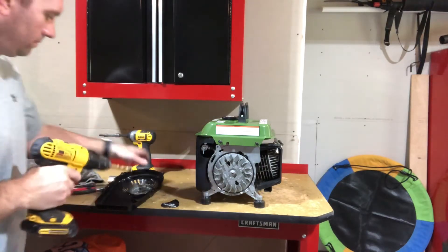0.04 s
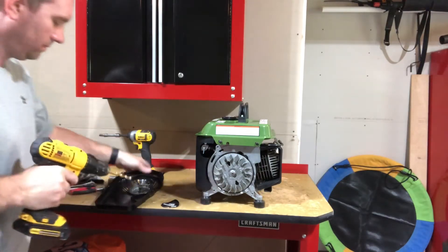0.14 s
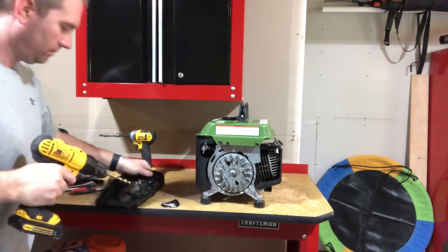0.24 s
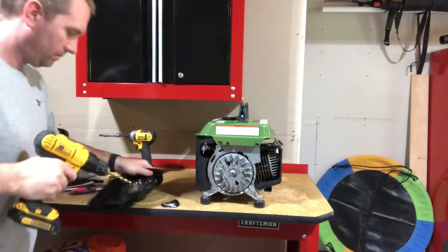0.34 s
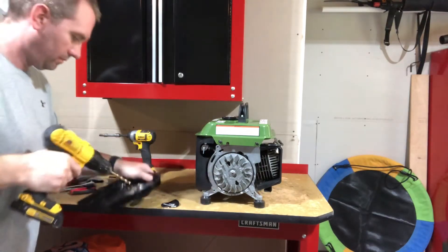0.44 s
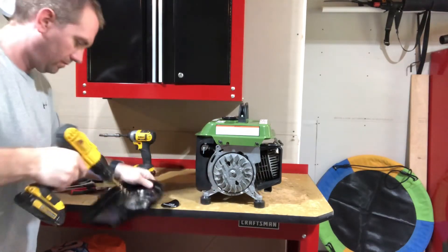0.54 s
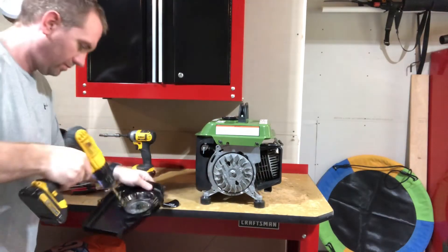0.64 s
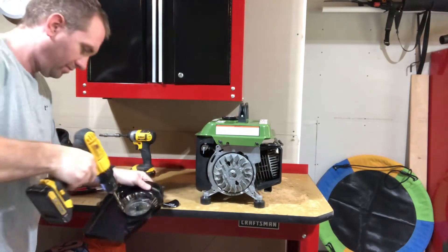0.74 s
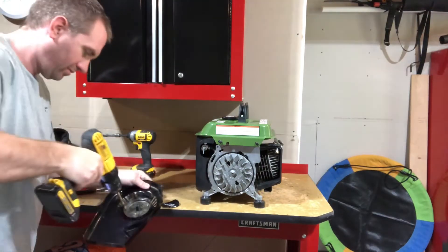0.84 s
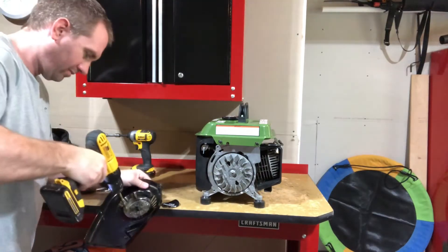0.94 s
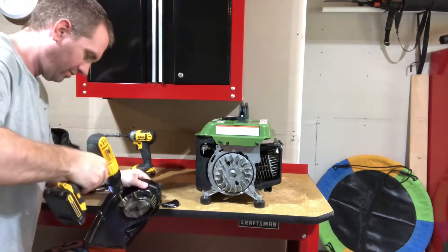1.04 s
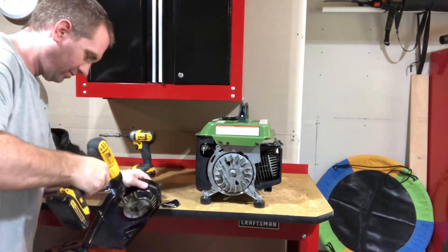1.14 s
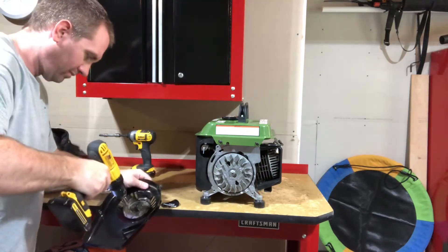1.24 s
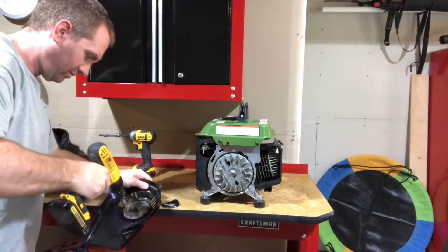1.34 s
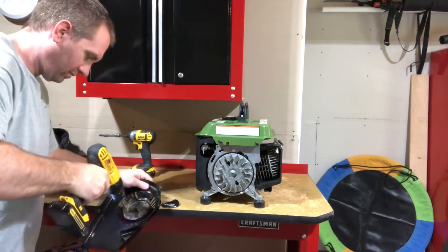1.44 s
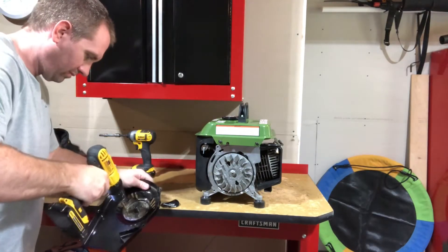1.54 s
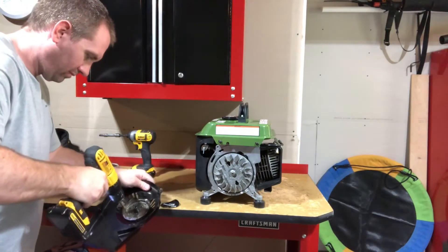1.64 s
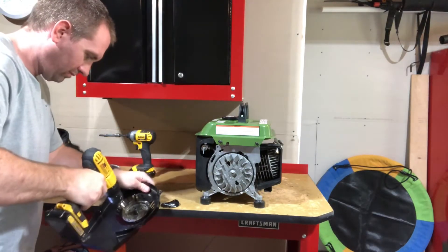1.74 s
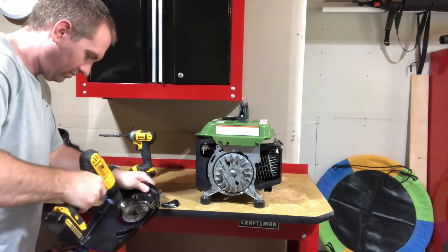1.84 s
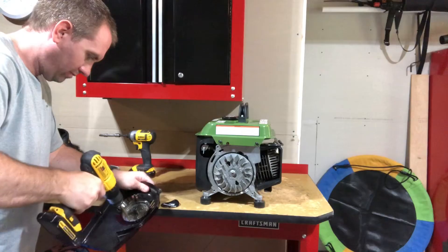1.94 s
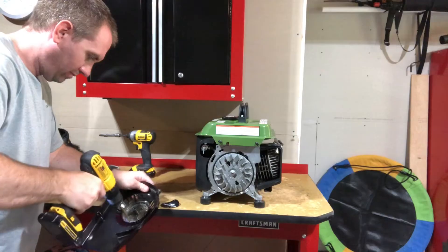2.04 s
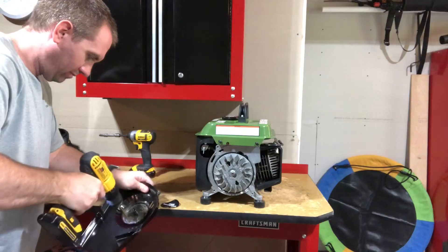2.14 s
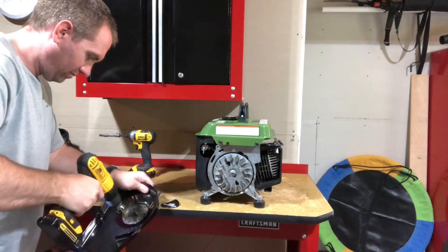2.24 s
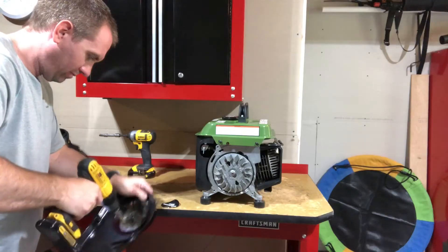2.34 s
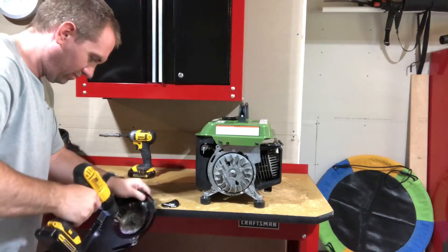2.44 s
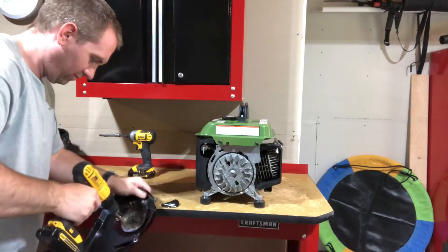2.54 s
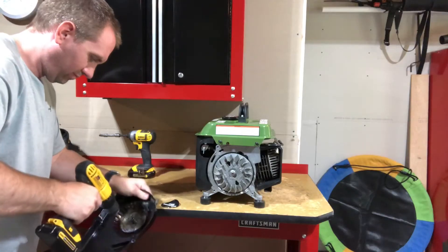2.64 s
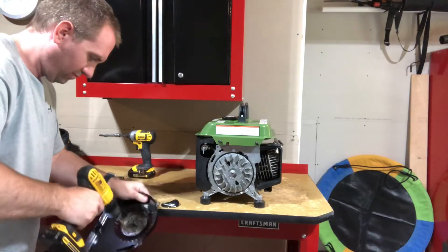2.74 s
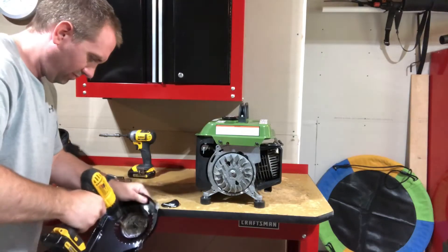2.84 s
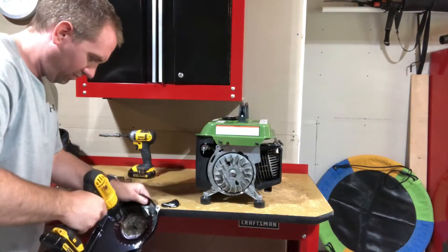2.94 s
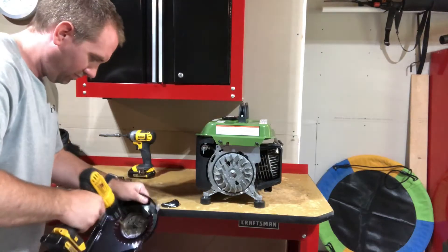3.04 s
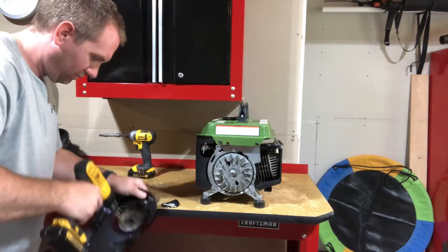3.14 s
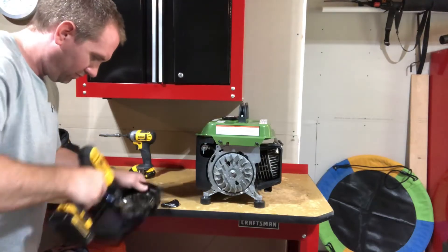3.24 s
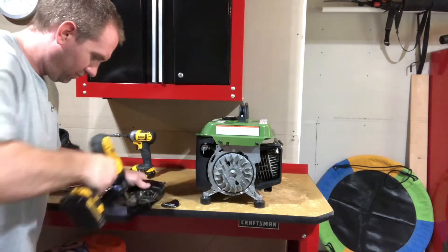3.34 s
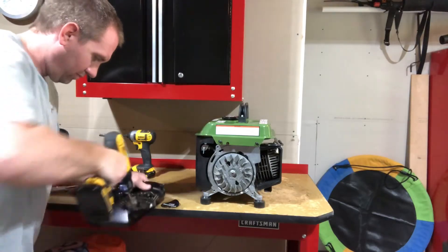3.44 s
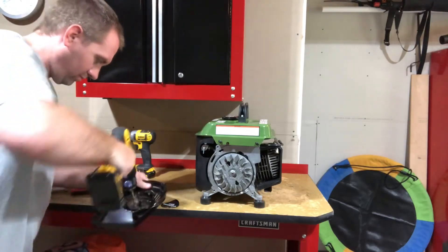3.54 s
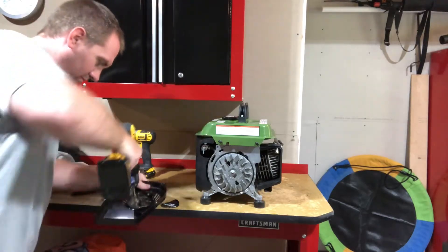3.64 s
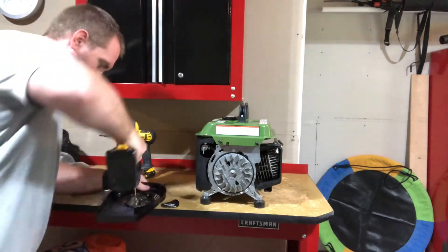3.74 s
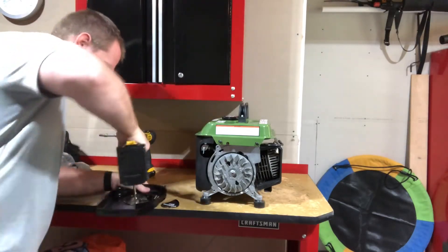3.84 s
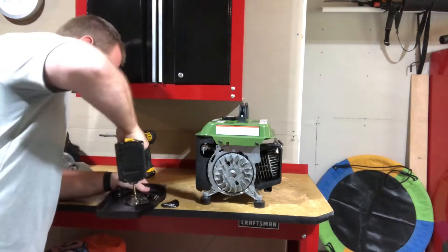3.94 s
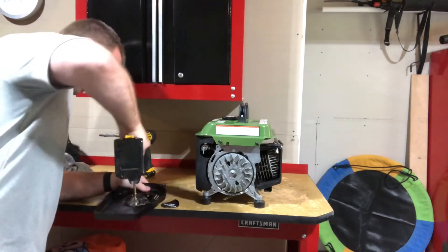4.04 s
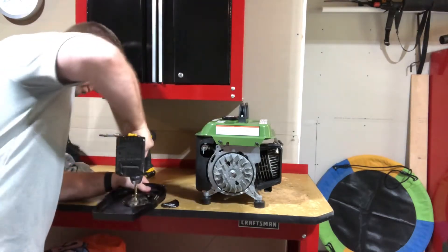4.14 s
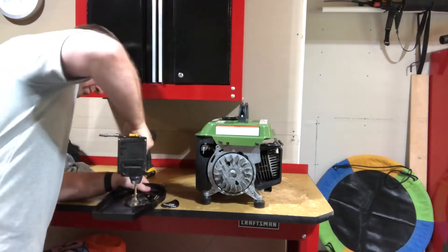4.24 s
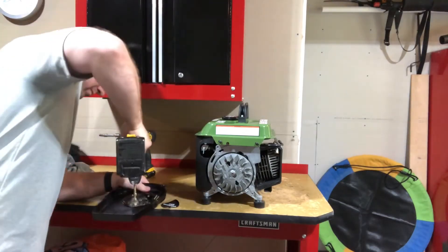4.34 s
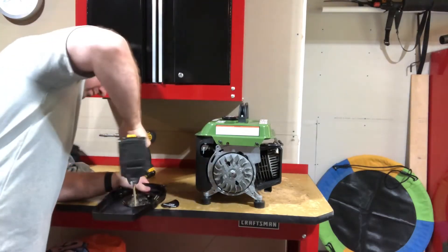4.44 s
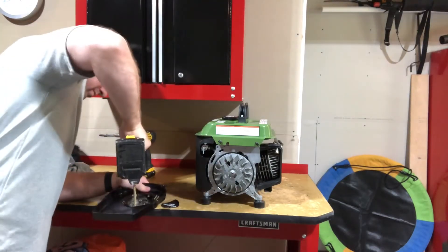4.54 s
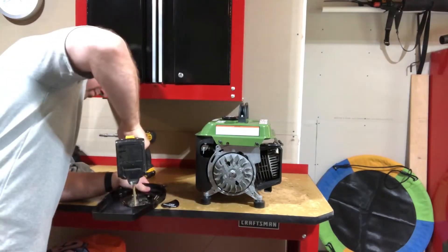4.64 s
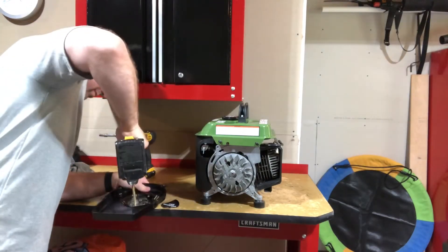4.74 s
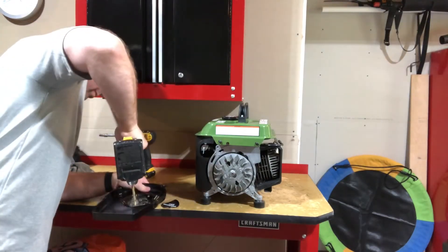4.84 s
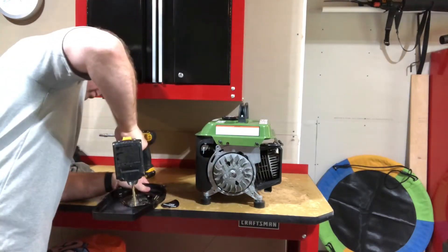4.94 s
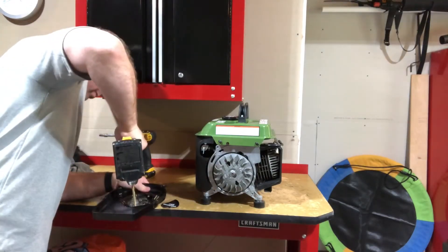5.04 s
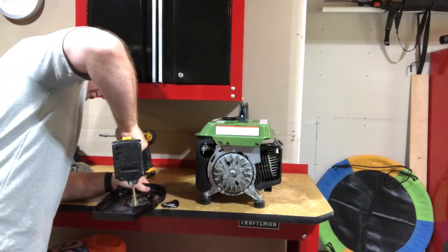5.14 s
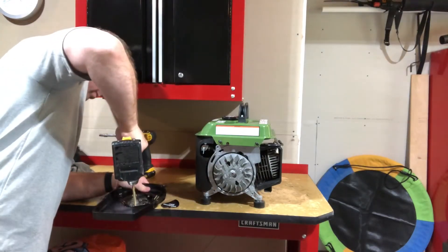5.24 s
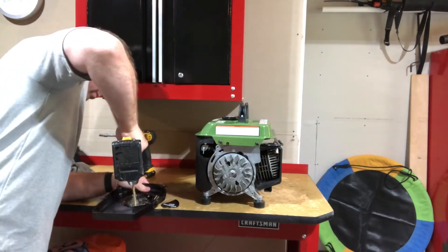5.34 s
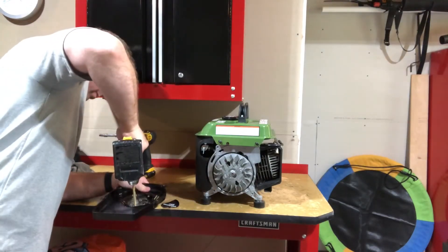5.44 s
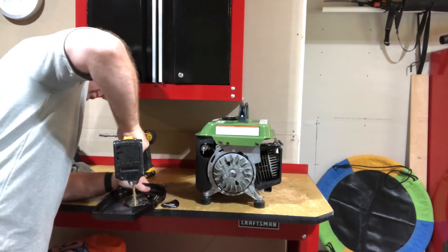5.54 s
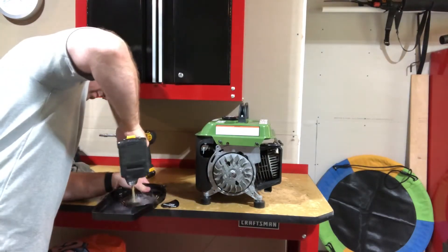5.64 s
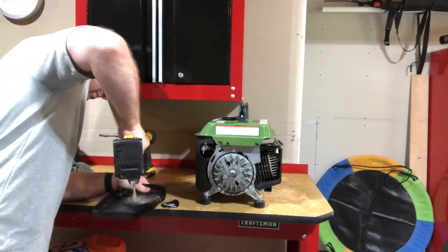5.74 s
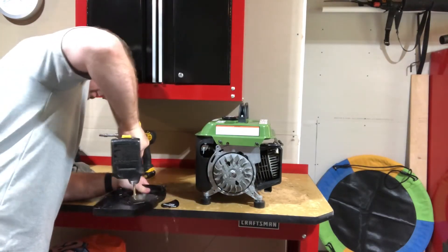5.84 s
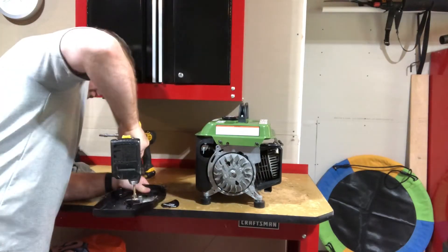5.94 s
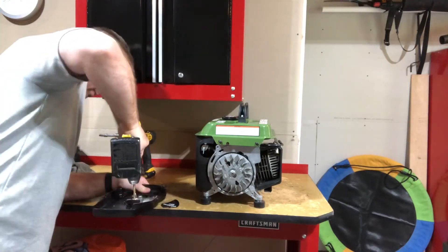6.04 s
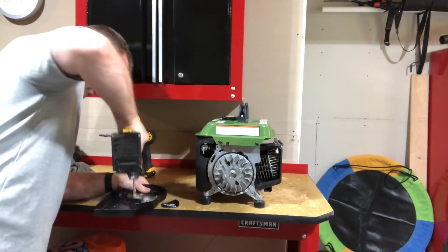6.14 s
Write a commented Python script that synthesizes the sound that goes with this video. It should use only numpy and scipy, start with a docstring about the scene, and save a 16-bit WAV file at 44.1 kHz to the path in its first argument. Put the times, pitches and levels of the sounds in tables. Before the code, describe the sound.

Sheet-metal cover knocks on a workbench, then a whining cordless drill bores twice with gritty rasp, ending in a loud clanging break-through.

```python
"""Over quiet room air, a sheet-metal cover is knocked about on a workbench in a bare garage: rattling bursts,
booms and clicks. Then a cordless drill bores into it twice. The speed control whistles at one pitch, the gears
whine along a speed curve that sinks as the bit is loaded, and chips make dense clicks shaped by the sheet.
At the end the bit breaks through and its lips snag the cover, in ringing bursts loud enough to overload
the mono microphone."""
import sys
import numpy as np
from scipy import signal
from scipy.fft import rfft, irfft
from scipy.io import wavfile

SR = 44100
rng = np.random.default_rng(int(sys.argv[2]) if len(sys.argv) > 2 else 0)


def persist_wave(psi):
    """Save psi, clipped to +-1, as 16-bit WAV."""
    counts = np.round(np.clip(psi, -1, 1) * 32767).astype(np.int16)
    wavfile.write(sys.argv[1], SR, np.atleast_2d(counts).T)


N = 272537
TIME = np.arange(N) / SR


def from_db(db):
    """Turn decibels into a gain."""
    return 10 ** (np.asarray(db) / 20)


def rms_one(x):
    """Scale a sound to unit power."""
    return x / np.sqrt(np.mean(x ** 2) + 1e-20)


def in_time(rows):
    """Read the columns of a curve at every sample."""
    s, *columns = np.transpose(rows)
    return [np.interp(TIME, s, c) for c in columns]


def running(start_s, end_s, edge_s=0.012):
    """One between two moments, with short ramps."""
    return np.clip(np.minimum(TIME - start_s, end_s - TIME) / edge_s + .5, 0, 1)


def at_hz(points, hz):
    """Read a table of values against pitch, on a logarithmic pitch axis."""
    f, value = np.transpose(points)
    return np.interp(np.log(np.maximum(hz, 1)), np.log(f), value)


def drift(rate_hz):
    """Random wandering of unit power, with this many new values a second."""
    knots = rng.standard_normal(4096)
    return rms_one(np.interp(TIME * rate_hz, np.arange(len(knots)), knots))


def convolve(x, response):
    """Pass a sound through an impulse response."""
    return signal.fftconvolve(x, response)[:N]


def colour(x, points, size=4096):
    """Filter with the given gains, without any sound ahead of the input (minimum phase)."""
    hz = np.arange(size // 2 + 1) * SR / size
    cepstrum = irfft(np.log(from_db(at_hz(points, hz))))
    # folding the cepstrum forward in time makes the filter minimum phase
    cepstrum[1:size // 2] *= 2
    cepstrum[size // 2 + 1:] = 0
    return convolve(x, irfft(np.exp(rfft(cepstrum))))


def three_bands(x, low_hz, high_hz):
    """Split a sound into bass, middle and treble."""
    cuts = [(low_hz, "low"), ([low_hz, high_hz], "band"), (high_hz, "high")]
    return [signal.sosfilt(signal.butter(3, hz, kind, fs=SR, output="sos"), x) for hz, kind in cuts]


def resonate(x, modes):
    """Each resonance of the sheet adds a narrow band of the sound to itself."""
    out = x.copy()
    for hz, width_hz, db in modes:
        r = np.exp(-np.pi * width_hz / SR)
        feed = np.array([1, 0, -1]) * (1 - r * r) / 2
        feedback = [1, -2 * r * np.cos(2 * np.pi * hz / SR), r * r]
        out += from_db(db) * signal.lfilter(feed, feedback, x + 1e-18)
    return out


def free_ring(x, modes):
    """The sheet sings on after a blow: each mode is a sine that dies away."""
    t = TIME[:SR]
    response = 0
    for hz, db, t60 in modes:
        sine = np.sin(2 * np.pi * hz * t)
        response = response + from_db(db - 60 * t / t60) * sine / np.sqrt(t60 * SR)
    return convolve(x, response)


# how long the echo of the garage takes to fall by 60 dB: pitch_hz [Hz], t60_s [s]
GARAGE_DECAY = [(60, 0.99), (250, 1.44), (1000, 0.7), (4000, 0.98), (8000, 0.74), (15000, 0.45)]


def garage(x, wet_db, treble_db, gap_s=0.0038):
    """Direct sound plus an echo tail of noise bands with their own decays; the power stays about the same."""
    t = TIME[:int(SR * np.sqrt(2))]
    edges = np.geomspace(30, 17000, 13)
    tail = 0
    for low, high in zip(edges, edges[1:]):
        hz = np.sqrt(low * high)
        t60 = at_hz(GARAGE_DECAY, hz)
        band_filter = signal.butter(2, [low, high], "band", fs=SR, output="sos")
        band = signal.sosfilt(band_filter, rng.standard_normal(len(t)))
        tilt = from_db(at_hz([(1000, 0.0044), (10000, treble_db)], hz))
        gain = tilt * np.sqrt(2 * np.log(1000) / (t60 * SR))
        tail = tail + gain * band * from_db(-60 * t / t60)
    onset = np.clip(t / gap_s - 1, 0, 1)   # silent for one gap, then fades in over another
    wet = from_db(wet_db)
    return (x + wet * convolve(x, tail * onset)) / np.sqrt(1 + wet ** 2)


# colour of the room air: pitch_hz [Hz], relative level_db [dB per Hz]
AIR_COLOUR = [(15, -74), (25, -9), (96, 6), (614, -11.5), (722, -9), (782, -7.5), (895, -7), (1110, -9.5),
              (1340, -11), (1450, -8), (1570, -15), (1800, -18), (3530, -21.5), (15500, -33)]
AIR_DB = -55.76


def room_air():
    """Steady coloured noise under everything."""
    return from_db(AIR_DB) * rms_one(colour(rng.standard_normal(N), AIR_COLOUR))


TILT_LOW_HZ, TILT_PIVOT_HZ, TILT_HIGH_HZ = 200, 1030, 6050   # a harder contact tilts the colour over this range


def blows(table, spectrum, modes, rise_share, ring_db):
    """Each blow is a dying burst of rattling contact, brighter if harder; long ones start more softly."""
    age = TIME[:SR // 5]
    hz, colour_db = np.transpose(spectrum)
    octaves = np.log2(np.clip(hz, TILT_LOW_HZ, TILT_HIGH_HZ) / TILT_PIVOT_HZ)
    out = np.zeros(N)
    for s, db, hardness, length_s, *_ in table:
        rise = 1 - np.exp(-age / (rise_share * length_s))
        rattle = rng.choice([-1., 1.], len(age)) * from_db(-60 * age / length_s) * rise
        shape = np.transpose([hz, db + colour_db + hardness * octaves])
        start = int(s * SR)
        out[start:start + len(age)] += colour(rattle, shape)[:len(age)]
    return out + from_db(ring_db) * free_ring(out, modes)


def boom(s, db, centre_hz, octaves, t60, rise_s=0.0044, count=40):
    """A knock sets many close panel modes swinging, strongest around a centre pitch."""
    out, age = np.zeros(N), TIME[:SR // 3]
    offset = np.linspace(-2, 2, count) + rng.uniform(-0.044, 0.02, count)
    hz = centre_hz * 2 ** (octaves * offset)
    modes = np.sin(2 * np.pi * (hz[:, None] * age + rng.random((count, 1))))
    swing = np.exp(-offset ** 2 / 2) @ modes
    start = int(s * SR)
    envelope = from_db(db - 60 * age / t60) * (1 - np.exp(-age / rise_s))
    out[start:start + len(age)] = rms_one(swing) * envelope
    return out


# light clicks of the bit, the trigger and the braking chuck:
# start_s [s], relative level_db [dB], hardness [dB per octave]
CLICKS = [(0.196, -54, 2), (0.929, -59, 2), (1.368, -54, 1.5), (1.591, -57, -0.5), (1.71, -45.5, 0),
          (2.818, -28, -1), (2.837, -32, 3.5), (2.85, -32.5, -2), (3.258, -43.5, -0.5), (4.283, -50, 0.5),
          (4.332, -46, 1.5)]
# colour of a click of the drill: pitch_hz [Hz], relative level_db [dB per Hz]
CLICK_COLOUR = [(30, -8), (125, 1), (290, 31), (850, 6.5), (1800, 19), (5200, 9.5), (15500, -8.5)]
# free ring of the loose cover: pitch_hz [Hz], relative level_db [dB], t60_s [s]
LOOSE_RING = [(2620, -5, 0.14), (3330, -30, .35), (4750, -27, 0.23), (5680, -27, 0.61), (7500, -22, 0.47)]
CLICK_S = 0.047   # time to fall by 60 dB


def clicks():
    """Short light contacts, all of one length, make the loose cover ring."""
    rows = [(*row, CLICK_S) for row in CLICKS]
    return blows(rows, CLICK_COLOUR, LOOSE_RING, rise_share=0.045, ring_db=-2)


# the bit taps the cover and leaves it ringing: start_s [s], relative level_db [dB]
TAP = (0.586, -16.5)


def tap():
    """One hard, point-like touch excites the high modes of the loose cover."""
    s, db = TAP
    touch = from_db(db) * signal.unit_impulse(N, int(s * SR))
    return free_ring(touch, LOOSE_RING) * np.sqrt(SR / 100)


# the cover knocks on the bench and on the drill: start_s [s], relative level_db [dB],
# hardness [dB per octave], length_s [s], boom_hz [Hz], relative boom_db [dB]
KNOCKS = [(0.248, -12.5, -1.5, 0.046, 912, -22), (0.255, -25, 0, 0.069, 399, -14),
          (0.581, -25.5, 2.3, 0.053, 290, -17.5), (0.643, -35, -3.5, 0.057, 161, -32.5),
          (1.344, -45, 1.5, 0.08, 446, -34), (1.683, -43, -2.5, 0.073, 590, -43),
          (3.125, -40.5, -0.5, 0.038, 321.4, -36), (3.17, -52, 2, 0.065, 286.6, -37),
          (3.452, -29, -3, 0.048, 1270, -31), (3.458, -32.5, -3, 0.086, 214.2, -24.5),
          (3.772, -36, 0.7, 0.11, 1840, -26), (3.796, -33.5, -0.1, 0.054, 376.5, -33)]
# colour of a knock: pitch_hz [Hz], relative level_db [dB per Hz]
KNOCK_COLOUR = [(30, -5), (125, 8.5), (250, 21.5), (520, 24.5), (900, 22), (1800, 12.5), (5200, 1.5),
                (15500, -18.5)]
BOOM_OCTAVES, BOOM_NARROWING = 0.62, 0.41   # spread of modes at 250 Hz; higher booms are narrower by this power
BOOM_CYCLES, BOOM_RISE_CYCLES = 48, 2   # cycles to fall by 60 dB, and time constant of the swell


def knocks():
    """Every knock rattles and booms; low booms are broad, swell later and last longer."""
    out = blows(KNOCKS, KNOCK_COLOUR, LOOSE_RING, rise_share=0.055, ring_db=-11)
    for s, *_, hz, db in KNOCKS:
        octaves = BOOM_OCTAVES * (250 / hz) ** BOOM_NARROWING
        out = out + boom(s, db, hz, octaves, BOOM_CYCLES / hz, BOOM_RISE_CYCLES / hz)
    return out


# the drill lunges through and the bench heaves:
# start_s [s], relative level_db [dB], centre_hz [Hz], spread [octaves], t60_s [s]
LUNGE = [(5.621, -26, 42, 0.28, 0.099), (5.691, -19, 169.7, 0.215, 0.38)]


def lunge():
    """Low booms of the bench as the drill lunges through."""
    return sum(boom(*row) for row in LUNGE)


# the trigger is held part way in: start_s [s], end_s [s], relative level_db [dB]
TRIGGER = [(1.755, 1.792, -32.5), (2.04, 2.442, -32), (4.327, 4.366, -36), (4.57, 5.639, -26.5)]
# overtones of the whistle: multiple [of SWITCH_HZ], relative level_db [dB]
WHISTLE_OVERTONES = [(1, 8), (2, -35), (3, -37)]
SWITCH_HZ = 3930
TRIGGER_FADE_SHARE = 0.1   # of each squeeze


def speed_control(start_s, end_s, level_db, whistle_db=-8.0, flutter_db=0.5):
    """Chopped current makes the windings whistle at one fixed pitch."""
    tone = sum(from_db(db) * np.sin(2 * np.pi * round(k) * SWITCH_HZ * TIME) for k, db in WHISTLE_OVERTONES)
    squeeze = running(start_s, end_s, TRIGGER_FADE_SHARE * (end_s - start_s))
    return rms_one(tone) * from_db(level_db + whistle_db + flutter_db * drift(25)) * squeeze


# motor speed as the pitch of the gear mesh, one curve a hole: time_s [s], pitch_hz [Hz]
GEARS = [
    [(1.765, 1650), (1.815, 2997), (1.87, 3840), (1.98, 3640), (2.1, 3280), (2.3, 3270), (2.45, 3130),
     (2.6, 2446), (2.86, 1516)],
    [(4.335, 1480), (4.38, 2768), (4.43, 3570), (4.55, 2680), (4.7, 2630), (4.93, 1967), (5.0, 2820),
     (5.1, 3225), (5.61, 2890)],
]
FULL_SPEED_HZ = 3200
HOUSING_HZ, HOUSING_WIDTH_HZ, HOUSING_DB = 2510, 310, 4.5   # resonance of the gear case
SPIN_UP_DB, SPIN_UP_HZ_PER_S = 8, 12000   # extra lift at that resonance, full at this acceleration
LABOUR_DB_PER_OCTAVE = 0.5   # louder as the motor is dragged below full speed


def gears(speed, hole, gear_db, wobble=.003, backlash=.45, backlash_rate=350,
          second_db=-13, third_db=-17, load_share=0.49):
    """The mesh tone follows the motor, which labours unevenly; play between the teeth roughens it."""
    hz, = in_time(speed)
    rasp_db, = in_time(hole)
    spin_up = np.clip(np.gradient(hz) * SR / SPIN_UP_HZ_PER_S, 0, 1)
    housing = np.exp(-((hz - HOUSING_HZ) / HOUSING_WIDTH_HZ) ** 2)
    housing_db = housing * (HOUSING_DB + SPIN_UP_DB * spin_up)
    labour_db = LABOUR_DB_PER_OCTAVE * np.log2(FULL_SPEED_HZ / hz)
    level_db = gear_db + load_share * rasp_db + housing_db + labour_db
    turning = 2 * np.pi * np.cumsum(hz * (1 + wobble * drift(60))) / SR
    phase = turning + backlash * drift(backlash_rate)
    tone = np.sin(phase) + from_db(second_db) * np.sin(2 * phase) + from_db(third_db) * np.sin(3 * phase)
    uneven = rms_one(tone * from_db(2.9 * drift(90)))
    return uneven * from_db(level_db) * running(speed[0][0], speed[-1][0])


# brief high tones of the drill: squeaks of the bit, and at 2.854 s the motor's electronic brake whistling:
# middle_s [s], pitch_hz [Hz], relative level_db [dB],
# length_s [s from the middle until the swell has fallen to 1/e]
HIGH_TONES = [(2.73, 5480, -32, 0.01), (2.854, 11670, -36, .012), (5.595, 5400, -40, 0.011),
              (5.602, 2680, -27, .012)]


def high_tones(waver=0.019):
    """Each squeak or brake whistle is a short swell at one wavering high pitch."""
    out = 0
    for s, hz, db, length_s in HIGH_TONES:
        phase = 2 * np.pi * np.cumsum(hz * (1 + waver * drift(300))) / SR
        swell = np.exp(-((TIME - s) / length_s) ** 2)
        out = out + from_db(db) * swell * np.sin(phase)
    return out


# the lips of the bit snag the sheet:
# start_s [s], relative level_db [dB], hardness [dB per octave], length_s [s]
CATCHES = [(5.615, -16, 5, 0.068), (5.634, -11, 0.5, 0.16), (5.65, -10.5, 1.2, 0.081),
           (5.661, -6.5, 1, 0.11), (5.677, -9, -2, 0.13), (5.689, -9.5, -0.7, 0.13),
           (5.704, -8.5, -1.5, 0.081), (5.724, -9, -1.5, 0.075), (5.741, -6.5, -0.5, 0.083),
           (5.767, -16, 0.5, 0.14), (5.779, -12, 0, 0.11), (5.794, -13, 0, 0.055),
           (5.834, -14.5, 0.5, 0.11), (5.861, -10.5, -0.9, 0.062)]
# colour of a snag: pitch_hz [Hz], relative level_db [dB per Hz]
SNAG_COLOUR = [(30, -21), (170, 4), (400, 8), (750, 14.5), (1150, 17), (1600, 13.5), (2700, 14), (5200, 11),
               (15500, -3)]
# free ring of the cover caught on the bit: pitch_hz [Hz], relative level_db [dB], t60_s [s]
CAUGHT_RING = [(1090, -22, 0.35), (1290, -36, 0.75), (1700, -24, 0.55), (3043, -14.5, 0.58),
               (3760, -32, 0.64), (4150, -29, 0.64), (5900, -34, .8), (7049, -6, 0.62), (7700, -24, 0.74),
               (8660, -29, 0.81)]
# resonances of the cover pressed on the bench: pitch_hz [Hz], width_hz [Hz], added_db [dB]
PRESSED = [(167.5, 17, 6.5), (255, 24, 6), (439, 78, 1.5), (705, 7.4, -6), (1062, 36, -2.5), (1282, 33, 3),
           (1500, 24, -5), (2006, 14, 1), (2510, 140, -17.5), (3546, 106, -7.5), (3650, 57, -12),
           (5500, 310, -8), (7840, 480, -5.5)]


def snags():
    """Hard bursts at the break-through ring the caught cover and its pressed resonances."""
    bursts = blows(CATCHES, SNAG_COLOUR, CAUGHT_RING, rise_share=0.027, ring_db=-0.5)
    return resonate(bursts, PRESSED)


# force of the cut, one curve a hole: time_s [s], relative rasp_db [dB]
HOLES = [
    [(1.68, -59), (1.745, -56), (1.77, -36.5), (1.804, -26.5), (1.885, -19), (1.95, -22.5), (2.36, -23.5),
     (2.79, -32.5), (2.865, -27)],
    [(4.328, -44), (4.365, -29.5), (4.46, -21.5), (4.545, -28), (4.785, -26.5), (4.83, -29.5), (4.945, -32),
     (5.04, -24.5), (5.53, -25.5), (5.61, -19)],
]
# colour of the cut, one a hole: pitch_hz [Hz], relative level_db [dB per Hz]
CUT_COLOURS = [
    [(35, -58), (60, -21), (163, -7.5), (206, -13), (351, -3.5), (394, -6.5), (613, -6.5), (756, -9),
     (1020, -3.5), (1170, -6), (1450, -4.5), (2470, -4), (3120, -14.5), (7720, -22.5), (15500, -29)],
    [(35, -48), (60, -10), (163, -1), (206, -3.5), (253, -3.5), (298, 2), (433, -2), (889, -4.5),
     (1260, -3), (1590, -5), (2410, -1), (3270, -13.5), (3840, -12), (4120, -13.5), (15500, -29.5)],
]
# resonances of the cover held in the hand: pitch_hz [Hz], width_hz [Hz], added_db [dB]
HELD = [(171, 8, 0), (289, 17, -5), (349, 11, -5.5), (533, 16, -21), (672, 14, -7.5), (996, 11, -11),
        (1450, 14, 6.5), (1775, 44, -7), (2400, 170, -22), (5200, 240, -6), (7800, 620, -5.5)]
HISS_DB_PER_OCTAVE = 1.5   # chips hiss more at speed
BITE_S = 0.071   # time constant of the rumble settling as the bit bites


def cutting(hole, speed, spectrum, modes, cut_db, rumble_db, unbitten_db, hiss_db,
            chips_per_s=2500, judder_db=1.02, judder_rate=90):
    """Chips tear off as dense, irregular clicks over a steady rub, and the bit judders."""
    rasp_db, = in_time(hole)
    mesh_hz, = in_time(speed)
    start_s, end_s = hole[0][0], hole[-1][0]
    low_db = rumble_db + unbitten_db * np.exp(-np.maximum(TIME - start_s, 0) / BITE_S)
    high_db = hiss_db + HISS_DB_PER_OCTAVE * np.log2(mesh_hz / FULL_SPEED_HZ)
    chips = rms_one(rng.choice([-1, 1], N) * (rng.random(N) < chips_per_s / SR))
    rub = 0.66 * rng.standard_normal(N)
    force = (chips + rub) * from_db(judder_db * drift(judder_rate))
    sheet = colour(resonate(force, modes), spectrum)
    low, middle, high = map(rms_one, three_bands(sheet, 716, 3640))
    sound = middle + low * from_db(low_db) + high * from_db(high_db)
    return sound * from_db(rasp_db + cut_db) * running(start_s, end_s)


def scene():
    """Handling, two holes and the break-through in the garage; whistle, tap and air are added without echo."""
    first = cutting(HOLES[0], GEARS[0], CUT_COLOURS[0], HELD,
                    cut_db=-1.38, rumble_db=-4.5, unbitten_db=3, hiss_db=-4.0)
    first += gears(GEARS[0], HOLES[0], gear_db=-27.5, wobble=0.0021, backlash=0.21)
    second = cutting(HOLES[1], GEARS[1], CUT_COLOURS[1], PRESSED,
                     cut_db=0.43, rumble_db=-5.5, unbitten_db=-10, hiss_db=-5.0)
    second += gears(GEARS[1], HOLES[1], gear_db=-25, wobble=0.0108, backlash=1.0, second_db=-9)
    whistle = sum(speed_control(*row) for row in TRIGGER)
    handling = garage(knocks() + clicks() + lunge(), wet_db=0.1, treble_db=-6.5) + tap()
    drilling = garage(first + second + high_tones(), wet_db=-6.0, treble_db=-4.5)
    break_through = garage(snags(), wet_db=-4.0, treble_db=-3.0)
    mono = room_air() + handling + whistle + drilling + break_through
    return np.stack([mono, mono])


CUTOFF_HZ = 15750


def record(dry, hardness=6):
    """The loudest peaks flatten at full scale and the top is cut."""
    clipped = dry / (1 + np.abs(dry) ** hardness) ** (1 / hardness)
    low_pass = signal.ellip(10, .1, 70, CUTOFF_HZ, fs=SR, output="sos")
    return signal.sosfilt(low_pass, clipped)


dry = scene()
out = record(dry)
persist_wave(out)
```